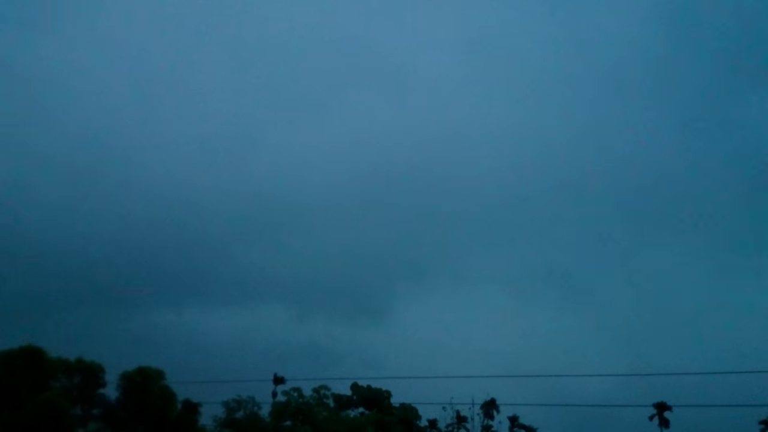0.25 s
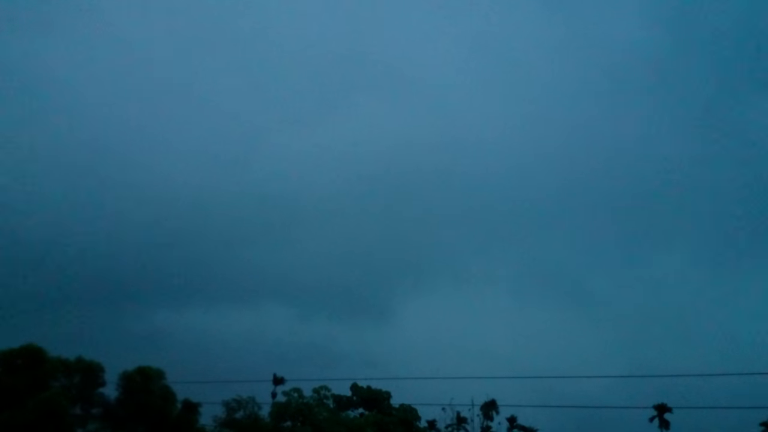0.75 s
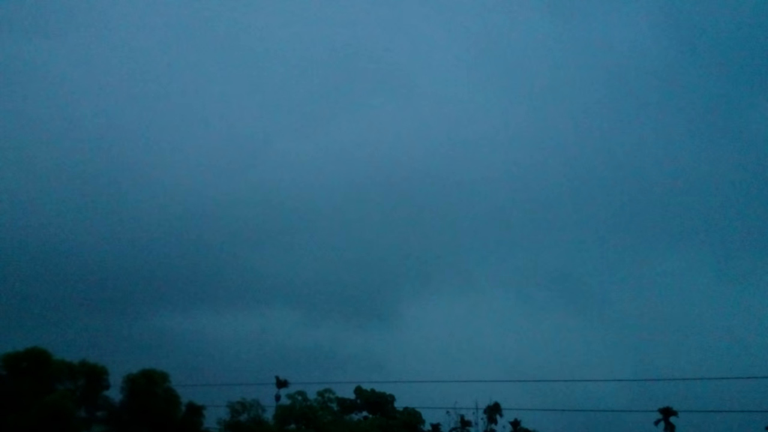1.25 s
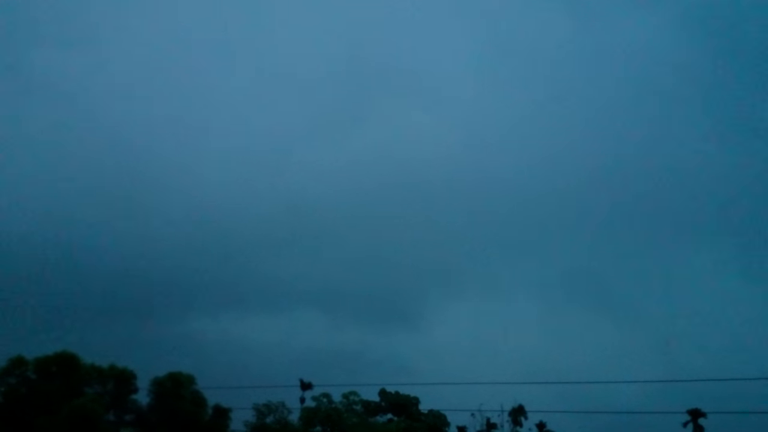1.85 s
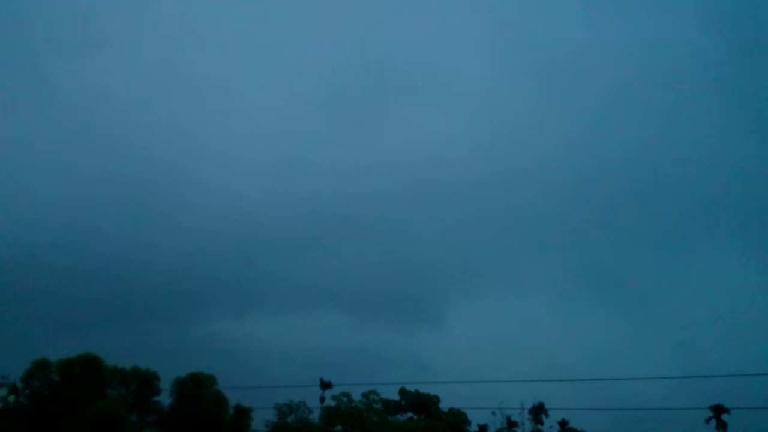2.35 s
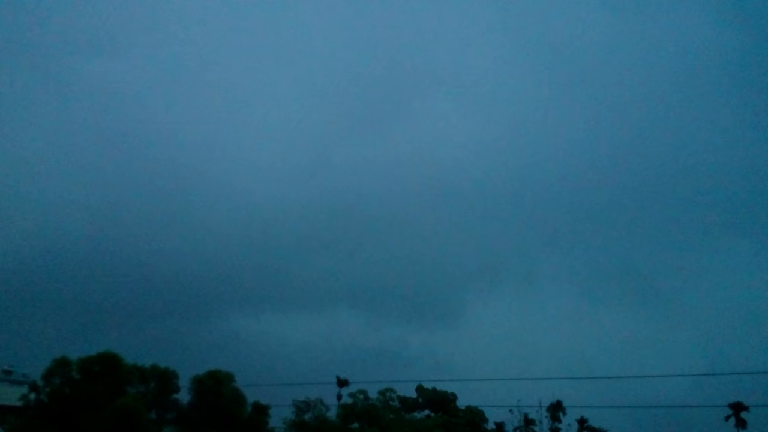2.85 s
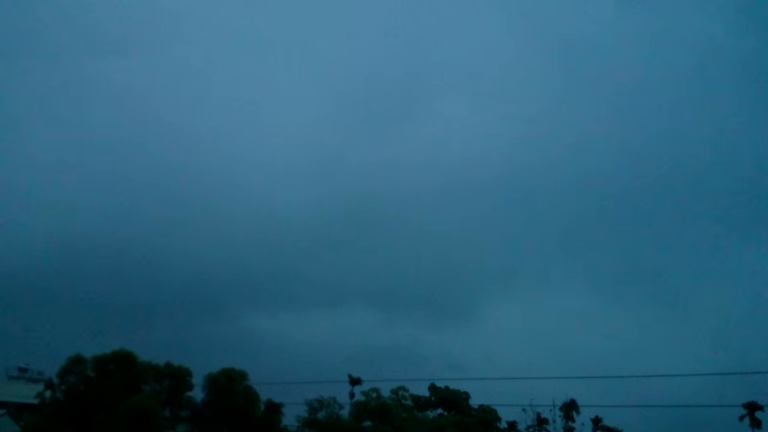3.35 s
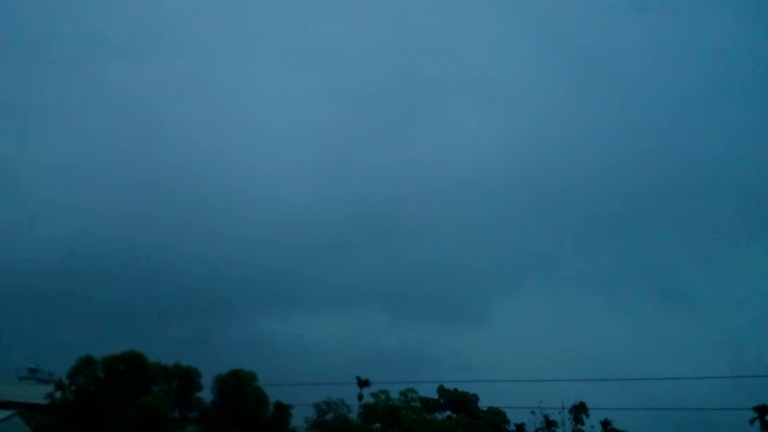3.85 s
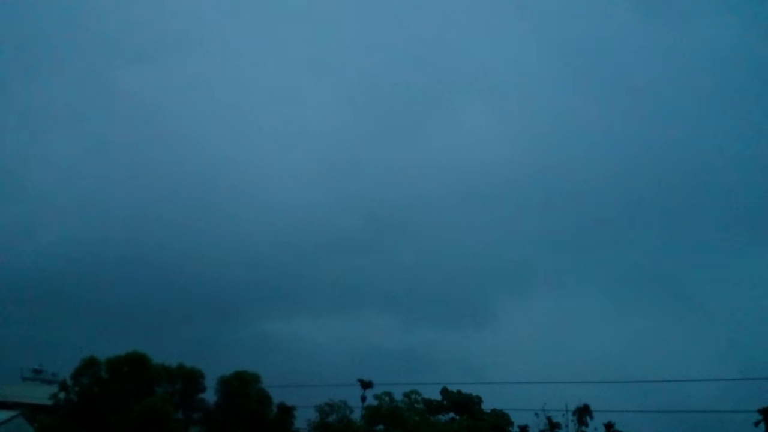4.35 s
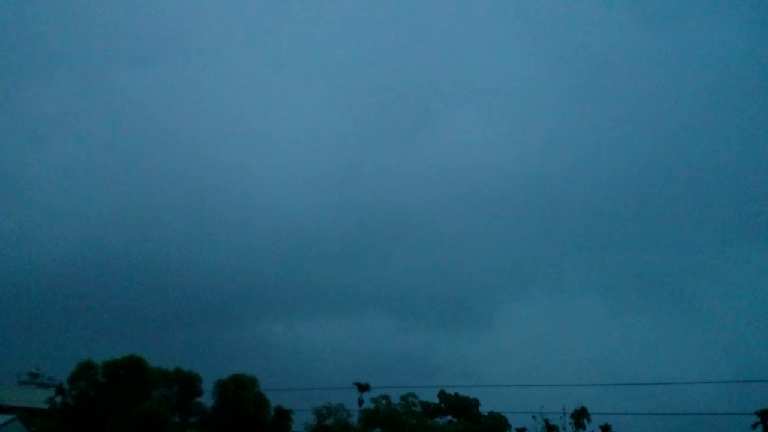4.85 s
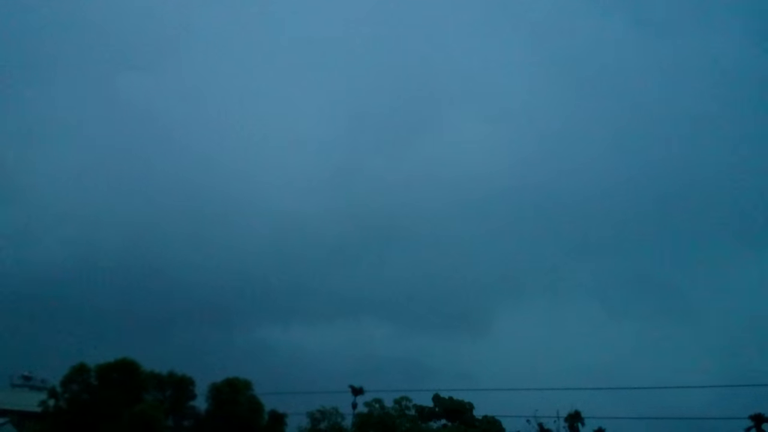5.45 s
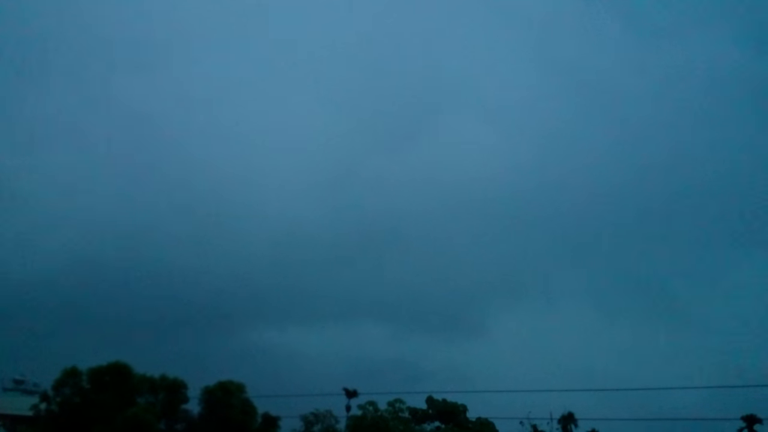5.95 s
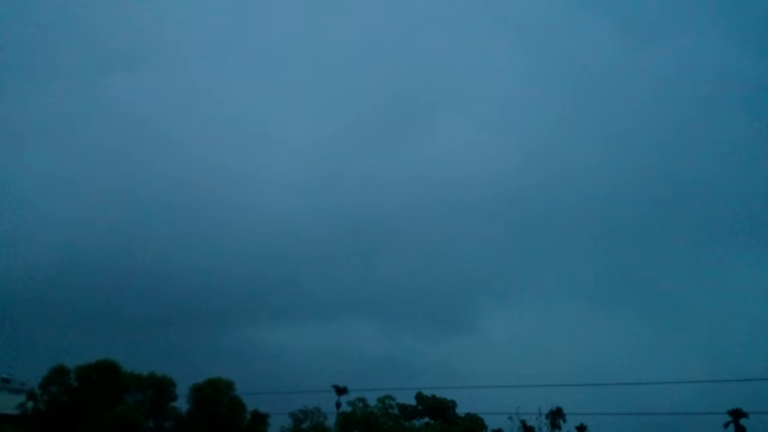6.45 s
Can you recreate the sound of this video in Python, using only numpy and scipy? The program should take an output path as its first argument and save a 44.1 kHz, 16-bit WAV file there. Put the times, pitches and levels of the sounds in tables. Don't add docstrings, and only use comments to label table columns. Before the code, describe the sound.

Dawn birdsong outdoors: a recurring half-second buzzy whistle, quick falling notes, chirps and ticks, with steady hiss, brief leaf rustles and soft low wind bumps.

```python
import sys
import numpy as np
from scipy import signal
from scipy.fft import rfft, irfft, next_fast_len
from scipy.io import wavfile
from scipy.ndimage import uniform_filter1d

SR = 44100
rng = np.random.default_rng(int(sys.argv[2]) if len(sys.argv) > 2 else 0)


def wrap_up_sound(samples):
    columns = np.atleast_2d(samples).T
    tamed = np.clip(columns, -1, 1)
    steps = np.round(tamed * 32767).astype(np.int16)
    wavfile.write(sys.argv[1], SR, steps)


def how_loud(loudness_db):
    steps = np.asarray(loudness_db, float) / 20
    return 10 ** steps


N = 296352
PORT_LAG = 17
GUST_FALL = 1.3
CALM_DB = -80

# frequency in Hz, likeness from 0 to 1.
PORT_LIKENESS = [(60, 0.36), (300, 0.96), (500, 0.54), (900, 0.16), (1150, 0.18), (1500, 0.57),
                 (1850, 0.22), (2300, 0.12), (3800, 0.53), (4600, .03)]
# frequency in Hz, level in dB.
LEFT_PORT = [(30, -55), (120, -50.5), (250, -48), (700, -38), (1000, -38), (1500, -41), (2400, -44),
             (3500, -42), (5000, -51.6), (6000, -46), (7900, -45.5), (9500, -55), (12000, -61),
             (15700, -71)]
RIGHT_PORT = [(30, -64.5), (250, -47.5), (700, -38.2), (1000, -38.5), (1500, -41), (2400, -43), (3500, -39),
              (4300, -40), (5100, -36.5), (6000, -44.5), (8000, -62), (11500, -61.5), (14000, -56.5),
              (15700, -61)]

# peak time in seconds, level in dB, rise in seconds over 20 dB.
GUSTS = [(.09, -53, .04), (.17, -53, .05), (.26, -58, .05), (.35, -57, .04), (.45, -49, .03),
         (.51, -56, .1), (.6, -67, .15), (.68, -57, .09), (.97, -60.5, .05), (1.13, -60, .1),
         (2.41, -70, .3), (2.51, -59, .1), (2.66, -61, .15), (2.77, -56, .12), (2.98, -47, .025),
         (3.04, -57, .1), (3.16, -68, .12), (3.535, -48, .05), (3.72, -61, .25), (3.82, -62, .05),
         (3.99, -59, .05), (4.06, -56, .08), (4.34, -59, .05), (4.59, -70, .15), (5.84, -65, .08),
         (6.25, -74, .1), (4.2, -72, .2), (5.5, -78, .4)]
# frequency in Hz, level in dB.
GUST_COLOUR = [(20, -46), (45, -4), (62, 4.5), (110, -5.5), (200, -11), (400, -40)]
# start in seconds, peak level in dB, pitch in Hz.
THUMPS = [
    (0.43, -47.5, 113),
    (2.969, -53, 108),
    (3.526, -48, 112),
    (3.546, -48, 110),
    (3.993, -53, 110),
    (4.039, -69, 110),
]

# peak time in seconds, level in dB, then rise and fall in seconds over 20 dB.
RUSTLES = [(.042, -58.5, .3, .2), (1.1, -75, .06, .3), (1.218, -73, .03, .08), (2.912, -69, .06, .1),
           (3.06, -80, .05, .15), (3.868, -74, .05, .15), (4.686, -58.5, .06, .3), (4.788, -61, .06, .1),
           (4.938, -66, .04, .08), (5.958, -65.5, .2, .25), (6.372, -70, .1, .2)]
# frequency in Hz, level in dB.
RUSTLE_COLOUR = [(1200, -25), (2200, -10), (3000, -11), (5000, -1.5), (8000, 2), (15000, 2)]

# slides per second, start pitch in Hz, spread of pitch in Hz,
# end pitch as a share of the start, level in dB.
FAR_BIRDS = (14, 5600.5, 499, 1.6, -18.5)
BIRDS = {"whistle": (49.5, 0.62, 85, 0.46, 0, -4.3, 1.8, 0.44, 0.71),
         "tail": (30, .2, 13, 0.23, 0, -1.5, -1.5, 0.37),
         "slide": (120, 0.82, 160, 0.73, 4130, .3, 3.2, 0.26),
         "twitter": (120, 0.7, 140, 0.75, 3600, -0.3, 3, 0.26),
         "chirp": (200, 0.6, 150, 0.54, 0, -0.54, 0.45, 0.34), "pip": (60, .4, 40, .4, 0, -.6, 1.5, .25),
         "rise": (95, .2, 30, .3, 0, -1.6, 1.6, 0.34), "tick": (110, 0.36, 14, 0.8, 0, -0.34, 1.3, 0.39)}

# ease (over 1 the glide slows as it lands), share of the length
# where it is loudest, start level in dB, end level in dB.
EASING = (1.3, .35, -4, -7)
LEVEL = (1.05, .4, -1.5, -3.5)
BUZZ = (1.6, .5, -6, -6)
FLICK = (1.7, .45, -3.5, -4)
SNAP = (.9, .9, -9, -.3)

# start in seconds, length in seconds, pitch in Hz, level in dB.
PIPS = [(.31, .03, 2620, -9), (.48, .03, 3000, -10), (.51, .04, 3650, -14), (.65, .05, 3580, -17),
        (1.68, .07, 4570, -12), (1.85, .05, 4330, -9), (2.155, .025, 2600, -13), (3.1, .04, 3650, -17),
        (3.24, .04, 3680, -17), (6.03, .02, 4030, 1), (6.21, .03, 4300, -3)]
# start in seconds, length in seconds, first pitch in Hz, last
# pitch in Hz, level in dB above the hiss. The next three tables are alike.
SLIDES = [(.2, .11, 6600, 4700, -7.5), (.47, .12, 5900, 4800, -10), (.76, .14, 5600, 4280, -13),
          (1.43, .095, 5500, 4150, -6), (1.82, .13, 5600, 4630, -7), (2.01, .115, 5500, 3980, -5),
          (2.05, .12, 5900, 4400, -4.5), (2.28, .15, 5800, 3950, -10), (2.5, .07, 6500, 5750, -4),
          (2.57, .05, 5500, 4950, -.6), (2.62, .045, 4900, 4250, -10), (3.85, .14, 6050, 3950, -10),
          (4.045, .12, 5500, 4200, -10), (4.29, .13, 5750, 4320, -6), (4.745, .11, 5800, 4050, .3),
          (4.775, .06, 6000, 5550, -.4), (5.28, .045, 5500, 4850, 1), (5.565, .115, 5500, 4300, 2.5),
          (5.545, .1, 6150, 5250, -1), (5.765, .075, 6700, 4850, 6), (6.225, .06, 5900, 5000, -1.5),
          (6.28, .045, 6250, 5950, 1.5), (6.55, .06, 5800, 4650, -4)]
TWITTERS = [(1.17, .08, 4900, 5100, -14), (1.52, .1, 4000, 4150, -10), (2.12, .03, 4000, 4020, -5),
            (2.16, .04, 4260, 4210, -2), (4.42, .08, 4350, 4270, -6), (4.85, .03, 4030, 3950, -3),
            (4.92, .08, 4500, 5200, -6), (5.0, .025, 4450, 4300, -2), (5.04, .06, 4550, 5300, -6),
            (5.1, .05, 5300, 4600, -7), (4.7, .03, 5400, 5100, -4), (4.81, .09, 5700, 5000, -6),
            (5.4, .17, 5000, 5350, -6), (6.33, .13, 5900, 5200, -8), (5.15, .03, 4500, 4550, -2),
            (5.19, .03, 3950, 3880, -7), (5.48, .04, 4200, 3930, -4), (5.665, .055, 4050, 3950, -4),
            (5.845, .04, 4790, 4760, .4), (5.96, .06, 4720, 5600, -5), (6.1, .1, 5300, 5210, -10),
            (6.36, .018, 2200, 4200, -6), (6.24, .11, 5150, 4950, -3.5), (6.63, .06, 4570, 4600, -8)]
CHIRPS = [(1.055, .075, 3150, 3470, 3.5), (1.1, .05, 3700, 4050, -2), (2.845, .07, 3750, 3980, 5),
          (2.92, .07, 3290, 3170, -7), (3.535, .052, 3350, 3650, 6.5), (3.59, .04, 3900, 4200, -2),
          (3.56, .05, 3250, 3310, -3), (5.31, .055, 3400, 4150, 6.5), (5.325, .095, 3280, 3480, -4),
          (5.88, .05, 3780, 4080, 6.5), (5.925, .045, 4050, 3850, 6.5), (5.952, .035, 5150, 5350, 3.5)]
TICKS = [
    (2.895, .021, 2960, 5500, 11),
    (2.918, .012, 3930, 5500, 7),
    (5.938, .017, 3280, 5430, 12),
]
# start in seconds, level in dB.
RISES = [
    (4.615, -4),
    (4.755, -4),
    (4.895, -2),
    (5.042, -2),
    (5.19, -6),
]
# length in seconds, first pitch in Hz, last pitch in Hz.
RISE = (.045, 2950, 3730)

# start in seconds, length in seconds, pitch in Hz, level in dB above the hiss.
WHISTLES = [
    (-.225, .525, 3275, 5.5),
    (1.652, .5, 3285, 5.5),
    (4.102, .51, 3280, 4),
    (6.465, .5, 3300, 6.5),
]
# share of the length, pitch shift in Hz, effort in dB.
WHISTLE_SHAPE = [(0, 50, -3), (.11, 5, 3), (.22, -35, -2), (.4, 30, .3), (.65, 25, -.3), (.78, -35, -.6),
                 (.9, -55, .6), (1, -100, -11)]
# seconds after the whistle starts, length in seconds,
# first pitch in Hz, last pitch in Hz, level in dB.
TAILS = [
    (.03, .36, 3080, 3060, -9),
    (.385, .14, 3100, 3035, -.4),
]


def evened(x):
    return x / np.sqrt(np.mean(x ** 2) + 1e-20)


def read(points, hz):
    f, value = np.transpose(points)
    return np.interp(np.log(hz + 1), np.log(f + 1), value)


def coloured(x, points):
    size = next_fast_len(N)
    gain = how_loud(read(points, np.fft.rfftfreq(size, 1 / SR)))
    return irfft(rfft(x, size) * gain, size)[..., :N]


def drift(count, seconds):
    width = max(int(seconds * SR), 1)
    smooth = uniform_filter1d(rng.standard_normal(count), width)
    return evened(uniform_filter1d(smooth, width))


def add(mix, s, sound):
    part = mix[round(s * SR):][:len(sound)]
    part += sound[:len(part)]


def bursts(rows):
    t = np.arange(0, N / SR + .002, .001)
    s, db, rise, fall = np.transpose(rows)[:, :, None]
    gain = how_loud(db - 20 * np.maximum((s - t) / rise, (t - s) / fall))
    total = np.sqrt((gain ** 2).sum(0))
    return np.interp(np.arange(N) / SR, t, total)


def garden(x, echo_db, t60):
    count = SR // 2
    taps = np.zeros((2, count))
    at = np.arange(100, count - 40, 40) + rng.integers(0, 40, (2, (count - 101) // 40))
    np.put_along_axis(taps, at, rng.standard_normal(at.shape), 1)
    taps *= how_loud(-60 * np.arange(count) / SR / t60)
    taps *= how_loud(echo_db) / np.linalg.norm(taps, axis=1)[:, None]
    taps[0, 0] = taps[1, PORT_LAG] = 1
    return signal.fftconvolve(x[None], taps / np.linalg.norm(taps[0]), axes=1)[:, :N]


def hiss():
    frames, hz = N // 256 + 5, np.fft.rfftfreq(1024, 1 / SR)
    a, b, c, d, patches = rng.standard_normal((frames, 513, 5)).T
    patches = uniform_filter1d(uniform_filter1d(patches, 14, 0), 16, 1)
    same = np.clip(read(PORT_LIKENESS, hz), 0, 1)[:, None]
    late = np.exp(-2j * np.pi * hz * PORT_LAG / SR)[:, None]
    left = a + 1j * b
    right = same * late * left + np.sqrt(1 - same ** 2) * (c + 1j * d)
    spectra = np.array([left, right]) * how_loud(0.99 * evened(patches))
    return evened(signal.istft(spectra, nperseg=1024, noverlap=768)[1][:, :N])


def wind():
    swells = bursts([(s, db, rise, GUST_FALL * rise) for s, db, rise in GUSTS])
    lumps = (swells + how_loud(CALM_DB)) * how_loud(1.5 * drift(N, 0.017))
    rumble = evened(coloured(rng.standard_normal((2, N)), GUST_COLOUR))
    out = lumps * how_loud(np.array([[-14], [3]])) * rumble
    t = np.arange(2000) / SR
    for at, peak_db, hz in THUMPS:
        u = t * hz / 1.64
        swell = np.sin(np.pi * np.minimum(u, 1)) ** 2
        add(out[1], at, how_loud(peak_db + 11) * swell * np.sin(2 * np.pi * hz * t))
    return out


def rustle():
    sizes = how_loud(3.5 * np.minimum(rng.exponential(1, N), 5))
    snaps = sizes * (rng.random(N) < 2500 / SR) * rng.choice([-1., 1.], N)
    scattered = evened(garden(snaps, 13, .05))
    leaves = .7 * scattered + .5 * rng.standard_normal((2, N))
    return how_loud(70) * bursts(RUSTLES) * evened(coloured(leaves, RUSTLE_COLOUR))


def note(rows, per_s, depth, swing_hz, hoarse, easy_hz):
    s, hz, db = np.transpose(rows)
    t = np.arange(s[0], s[-1], 1 / SR)
    centre = np.interp(t, s, hz)
    strain = np.clip((centre - easy_hz) / 1000, .55, 1)
    rate = per_s * (1 + .15 * hoarse * drift(len(t), 0.00644))
    turns = np.cumsum(rate) / SR + rng.random()
    pitch = centre + strain * swing_hz * np.sin(2 * np.pi * turns)
    beat = 0.36 * np.cos(2 * np.pi * turns) + .66 * np.cos(4 * np.pi * turns)
    pulses = 1 + np.clip(depth, 0, 1) * beat
    pulses *= 1 + strain * hoarse * drift(len(t), 0.0012)
    voice = evened(pulses * np.sin(2 * np.pi * np.cumsum(pitch) / SR))
    fade_s = min(.006, len(t) / SR / 4)
    edges = np.clip(np.minimum(t - s[0], s[-1] - t) / fade_s, 0, 1)
    return s[0], how_loud(np.interp(t, s, db)) * edges * voice


def bird(notes, per_s, depth, swing_hz, hoarse, easy_hz, db, echo_db, t60, right_db=0):
    song = np.zeros(N)
    for rows in notes:
        add(song, *note(rows, per_s, depth, swing_hz, hoarse, easy_hz))
    return how_loud(db + np.array([[-right_db], [right_db]])) * garden(song, echo_db, t60)


def far_birds(per_s, hz, spread_hz, fall, db):
    slides = []
    for k, (late, high, long, loud) in enumerate(rng.random((100, 4))):
        s = (k + late) / per_s
        first_hz = hz + spread_hz * (2 * high - 1)
        end = s + .06 + .1 * long
        slides.append([(s, first_hz, 8 * loud - 4), (end, first_hz * fall, 8 * loud - 7)])
    return bird(slides, per_s=70, depth=0.4, swing_hz=95, hoarse=0.42, easy_hz=0,
                db=db, echo_db=9, t60=0.34)


def glide(rows, ease, peak, start_db, end_db):
    u = np.linspace(0, 1, num=12)
    swell_db = np.interp(u, [0, np.clip(peak, .05, .95), 1], [start_db, 0, end_db])
    paths = []
    for s, length, hz, to, db in rows:
        pitch = to + (hz - to) * (1 - u) ** ease
        paths.append(np.transpose([s + u * length, pitch, db + swell_db]))
    return paths


def tails():
    rows = []
    for start, *_ in WHISTLES:
        for late, *rest in TAILS:
            if 0 < start + late < N / SR:
                rows.append((start + late, *rest))
    return glide(rows, *BUZZ)


def whistles():
    share, shift_hz, effort_db = np.transpose(WHISTLE_SHAPE)
    paths = []
    for s, length, hz, db in WHISTLES:
        t = np.linspace(max(s, 0), s + length, num=40)
        u = (t - s) / length
        pitch = hz + np.interp(u, share, shift_hz)
        paths.append(np.transpose([t, pitch, db + np.interp(u, share, effort_db)]))
    return paths


def songs():
    return {"pip": glide([(s, length, hz, hz, db) for s, length, hz, db in PIPS], *LEVEL),
            "slide": glide(SLIDES, *EASING),
            "twitter": glide(TWITTERS, *LEVEL),
            "chirp": glide(CHIRPS, *BUZZ),
            "tick": glide(TICKS, *SNAP),
            "rise": glide([(s, *RISE, db) for s, db in RISES], *FLICK),
            "tail": tails(),
            "whistle": whistles()}


def scene():
    air = hiss() + rustle() + far_birds(*FAR_BIRDS)
    for name, notes in songs().items():
        air = air + bird(notes, *BIRDS[name])
    ports = np.array([coloured(air[0], LEFT_PORT), coloured(air[1], RIGHT_PORT)])
    return ports + wind()


def low_pass(x):
    return signal.sosfilt(signal.butter(12, 15740, fs=SR, output="sos"), x)


def record(dry):
    mix = dry - .0004
    return low_pass(mix)


dry = scene()
out = record(dry)
wrap_up_sound(out)
```